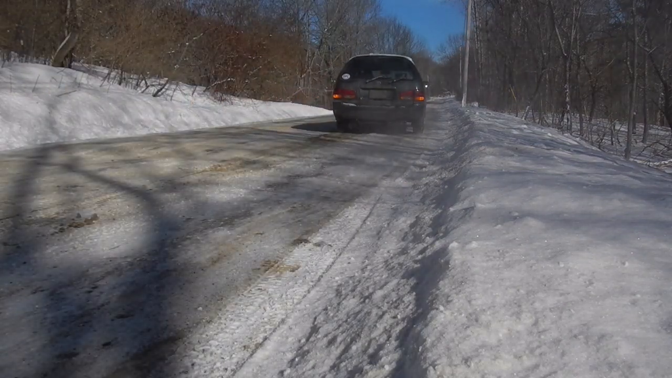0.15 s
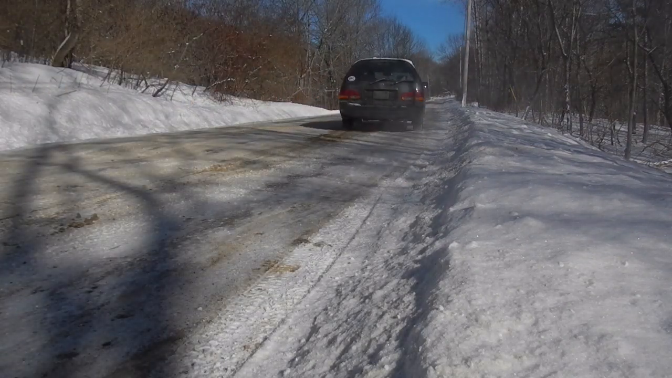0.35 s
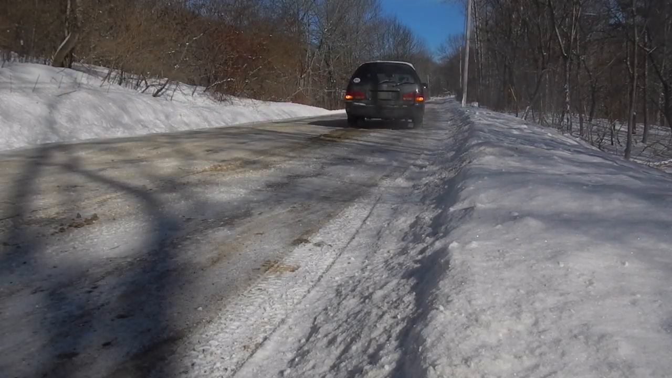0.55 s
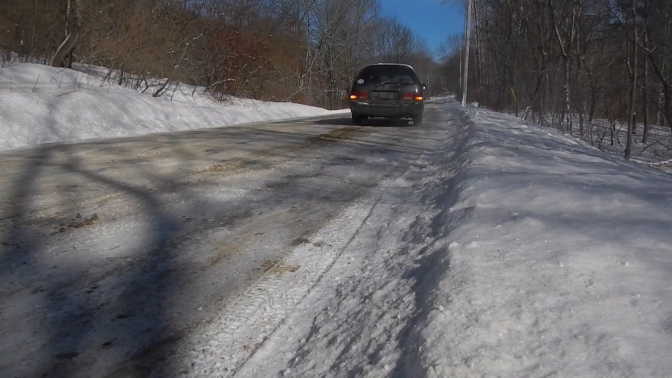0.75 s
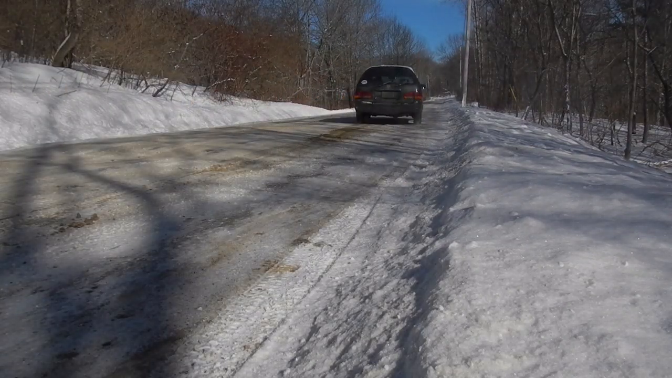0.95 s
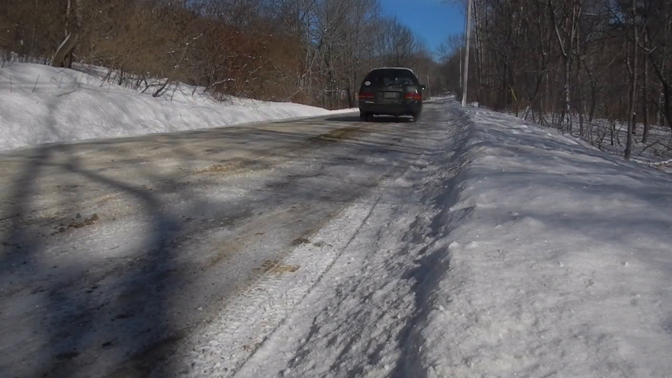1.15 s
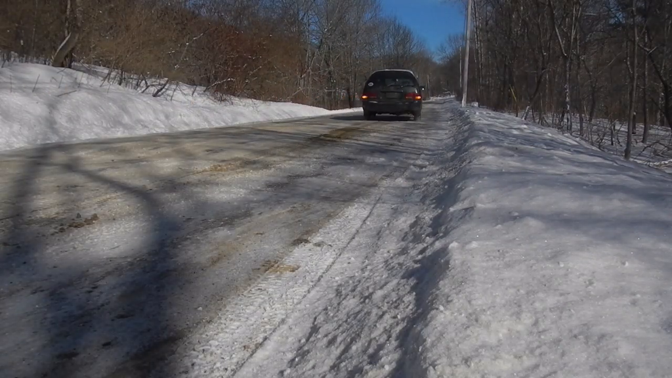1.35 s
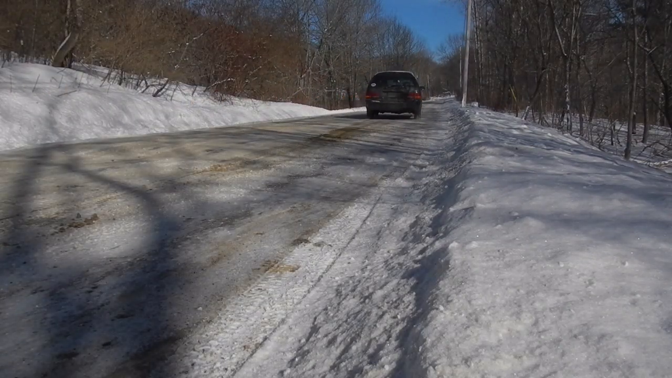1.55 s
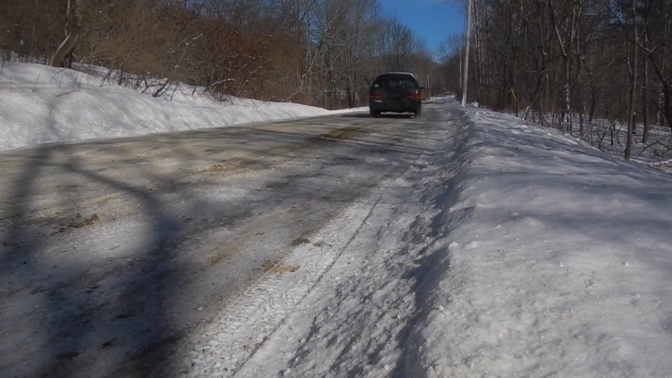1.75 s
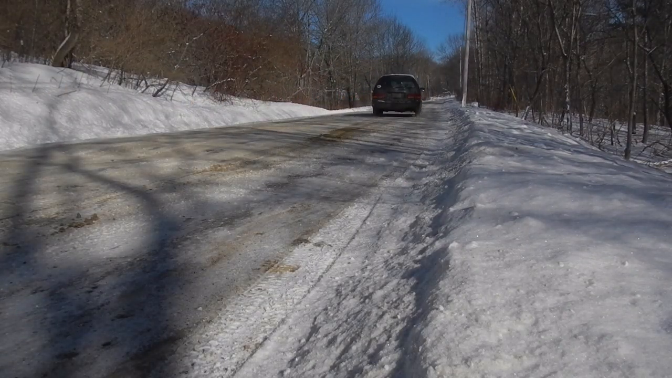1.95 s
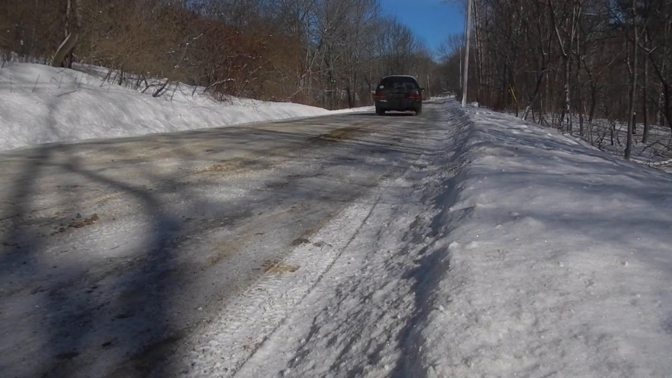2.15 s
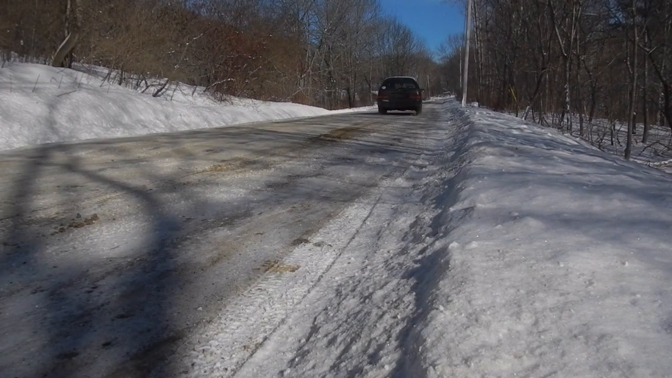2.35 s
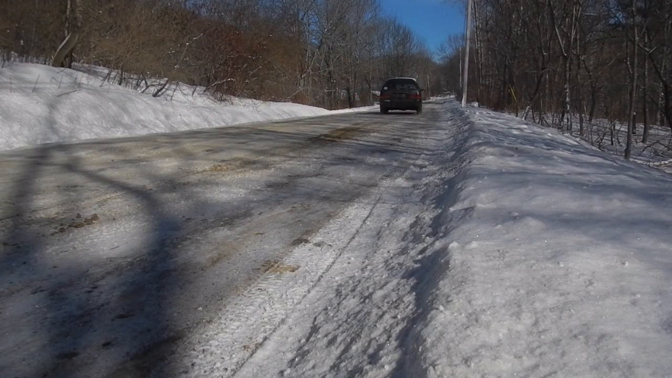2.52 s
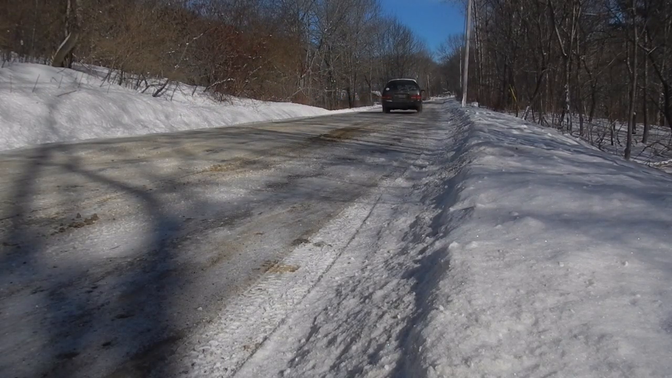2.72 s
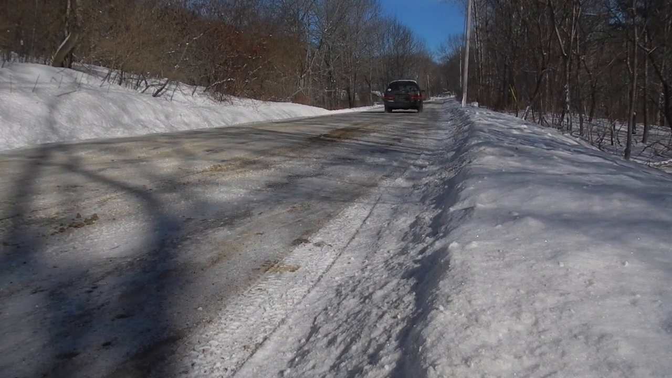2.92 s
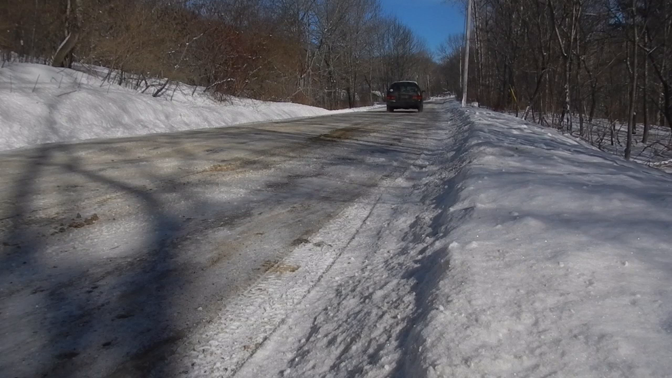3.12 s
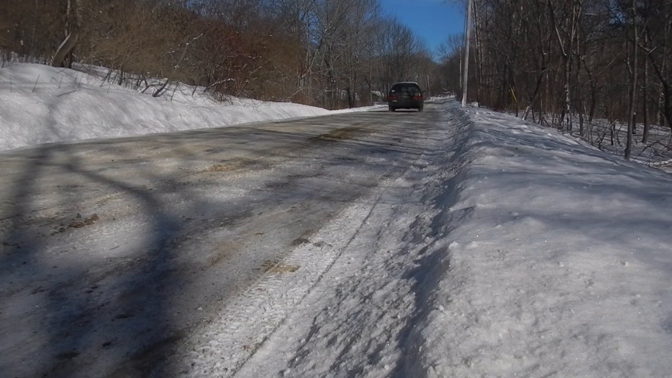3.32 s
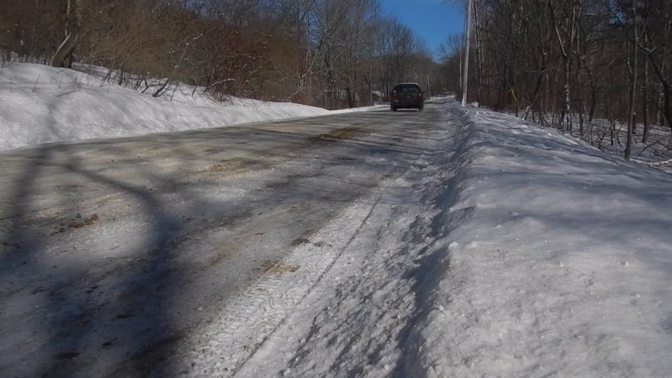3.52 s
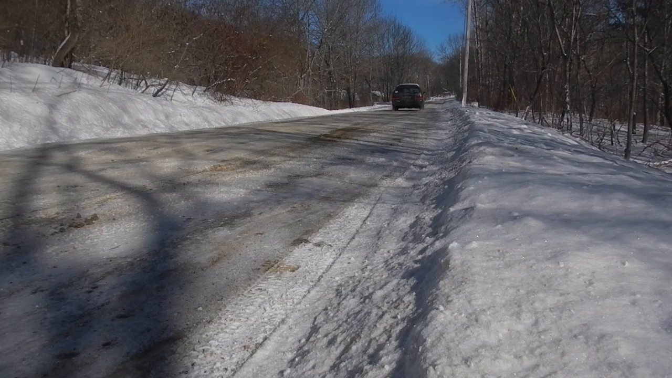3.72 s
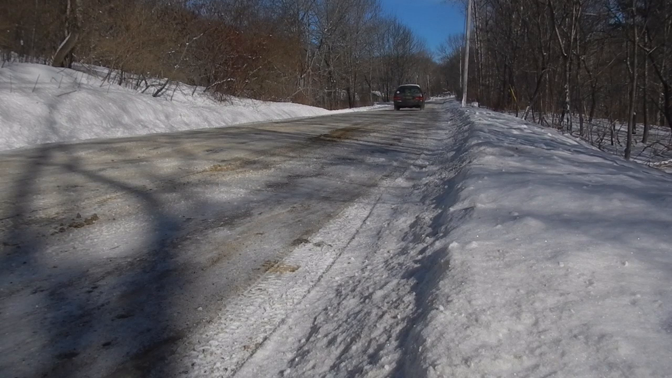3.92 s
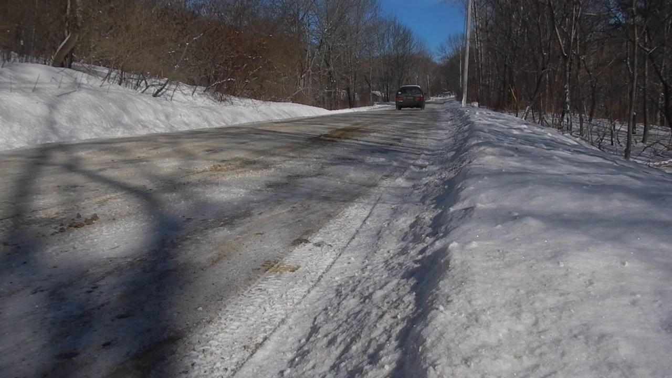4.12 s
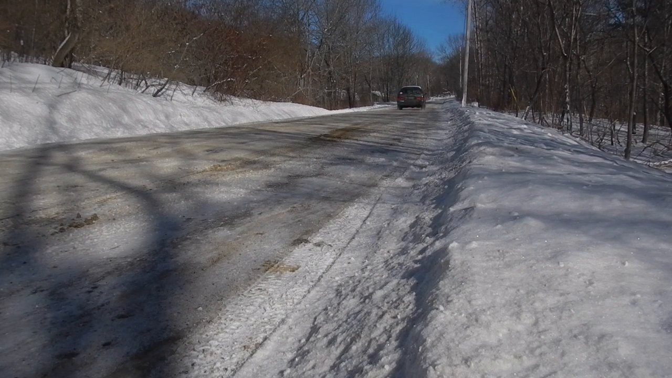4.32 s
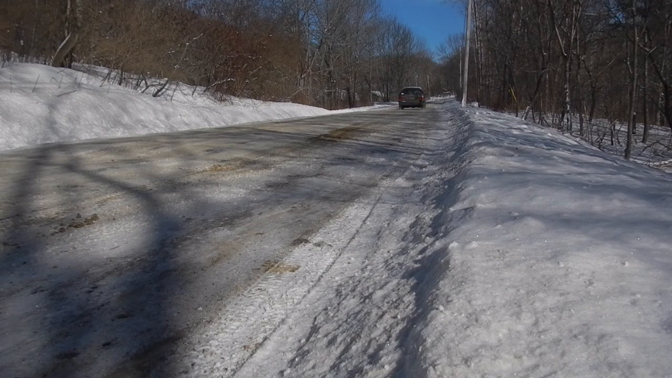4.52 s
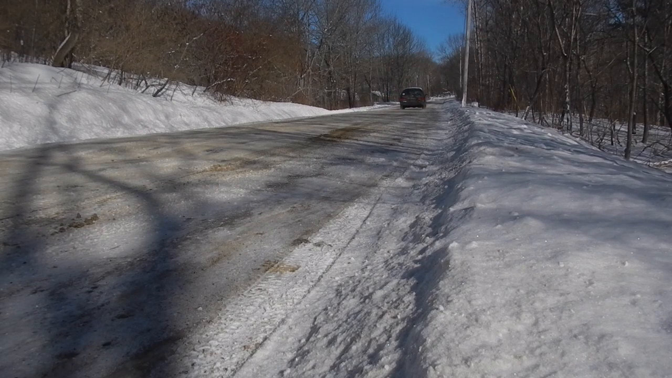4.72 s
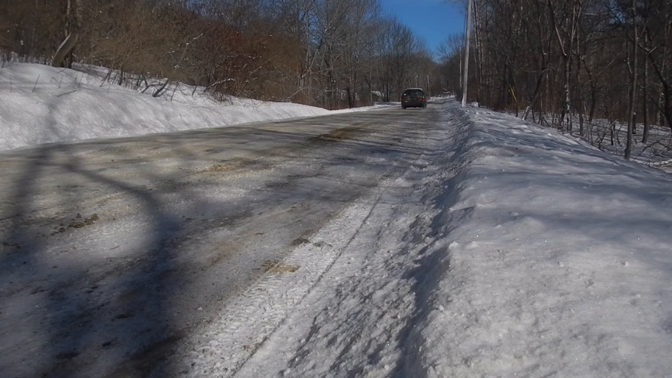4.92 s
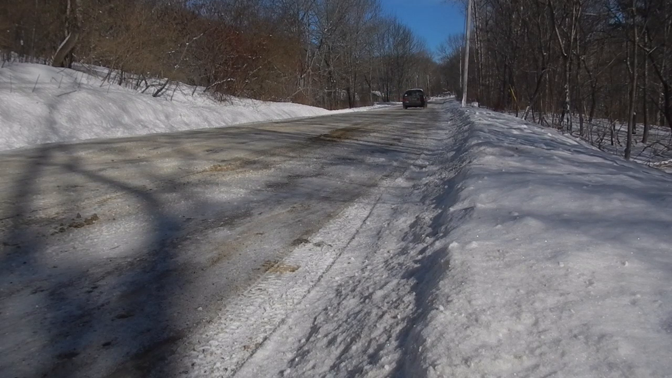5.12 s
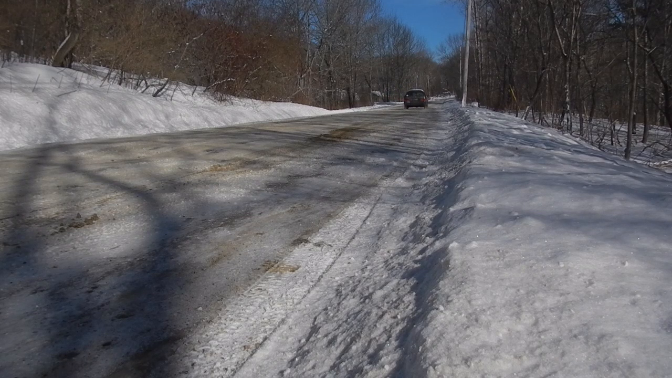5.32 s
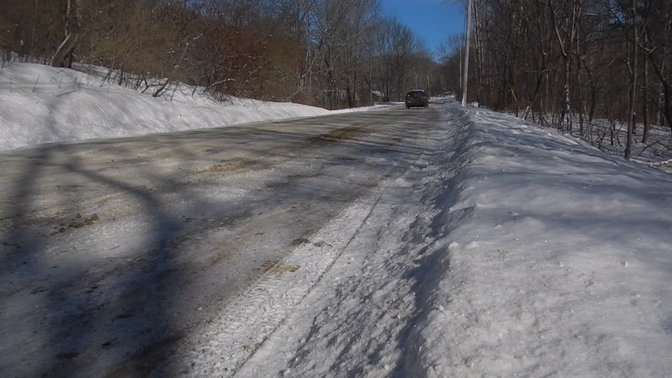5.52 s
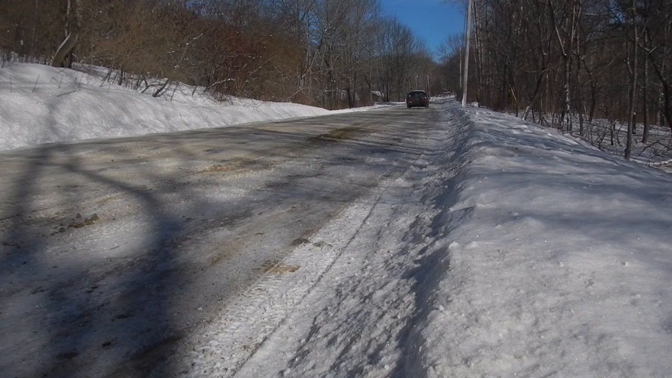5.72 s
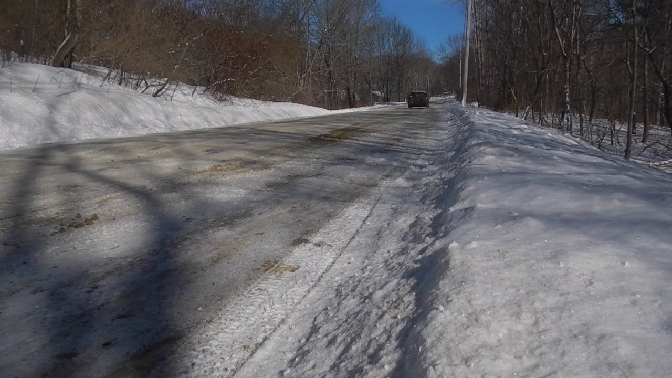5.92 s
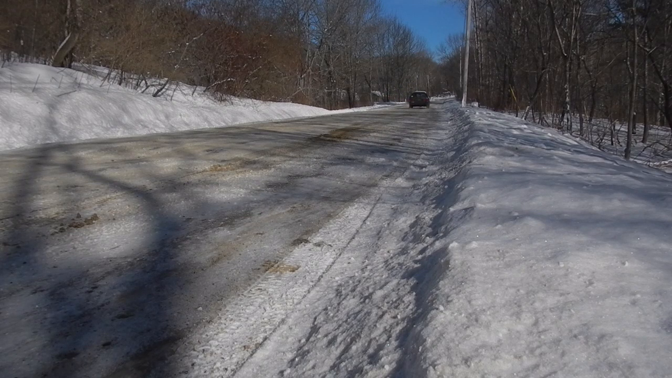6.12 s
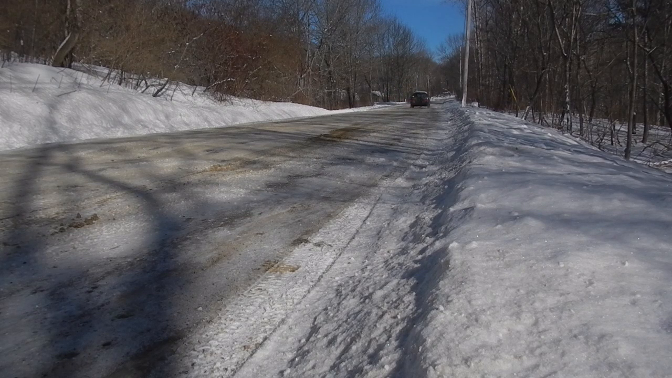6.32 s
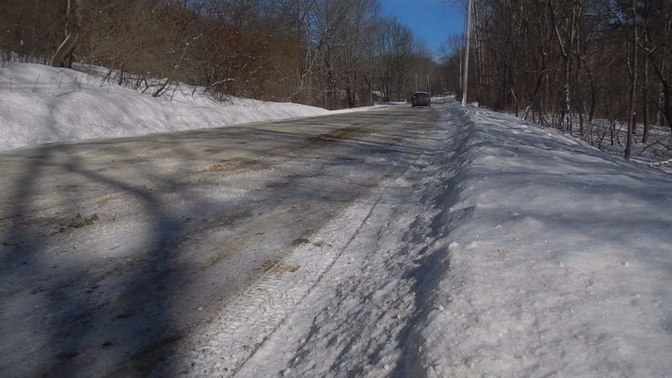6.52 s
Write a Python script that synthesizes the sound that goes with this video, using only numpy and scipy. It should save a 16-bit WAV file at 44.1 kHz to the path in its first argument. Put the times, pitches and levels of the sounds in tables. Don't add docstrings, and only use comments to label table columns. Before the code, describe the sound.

From 0 s a four-cylinder car, already about fifteen metres away, accelerates off along a snowy, tree-lined road. Its open exhaust makes a deep buzzing boom near 120 Hz with puffing rasp, rising slightly until 1.6 s. Broad tyre roar surrounds it, strongest at the start; gritty crunches cluster between 0.2 and 1.2 s, with dry stone ticks at 0.3 to 0.5 s, one at 1.2 s and a hard one at 2.1 s. Around 1.7 to 2.1 s it shifts up: the pitch sinks, the taller gear grips, and the note slowly climbs again to the end at 6.6 s, steadily quieter. Fine slush spray swells now and then, last near 5.9 s. Thin bird chips around 7.4 kHz dot the first 3.4 s. A far steady drone lies right; the stereo camera microphones add soft hiss, a faint high whine and tiny treble blips.

```python
import sys
import numpy as np
from scipy import signal
from scipy.fft import rfft, irfft, next_fast_len
from scipy.io import wavfile
from scipy.ndimage import map_coordinates

SR = 44100
rng = np.random.default_rng(int(sys.argv[2]) if len(sys.argv) > 2 else 0)


def dump(signal):
    limited = np.clip(np.atleast_2d(signal).T, -1, 1)
    pcm = np.round(limited * 32767).astype(np.int16)
    wavfile.write(sys.argv[1], SR, pcm)


def natural_amplitude(level_db):
    exponent = np.asarray(level_db, float) / 20
    return 10 ** exponent


N = 293706


def unit(x):
    return x / np.sqrt(np.mean(x ** 2) + 1e-20)


def along(points, hz):
    f, v = np.transpose(points)
    return np.interp(np.log(hz + 1), np.log(f + 1), v)


def curves(rows):
    s, *cols = np.transpose(rows)
    return [np.interp(np.arange(N) / SR, s, c) for c in cols]


def wobble(rate):
    at = np.arange(0, N + 16, 16)
    knots = rng.standard_normal(int(N * rate / SR) + 4)
    return np.interp(np.arange(N), at, map_coordinates(knots, [at * rate / SR]))


def filtered(x, response):
    m = next_fast_len(N + SR // 2)
    return irfft(rfft(x, m) * response(np.fft.rfftfreq(m, 1 / SR)), m)[..., :N]


def rush(spectrum, alike, source=None):
    pair = rng.standard_normal((2, N))
    if source is not None:
        pair = pair * source

    def mid_side(hz):
        turn = np.arccos(np.clip(along(alike, hz), -1, 1)) / 2
        return natural_amplitude(along(spectrum, hz)) * [np.cos(turn), np.sin(turn)]

    mid, side = filtered(pair, mid_side)
    return unit(np.array([mid + side, mid - side]))


# (frequency [Hz], left minus right [dB])
LEVEL_TILT = [(60, 0.5), (130, -0.6), (350, -1.8), (800, -2), (1400, -2.5), (2500, -0.5), (5000, -1.5)]
# (frequency [Hz], left leads by [rad])
PHASE_LEAD = [(35, 0), (60, -.45), (125, -.3), (190, -.22), (350, -.14), (800, -.07), (2400, 0),
              (3500, -.2)]


def ports(hz):
    half = natural_amplitude(along(LEVEL_TILT, hz) / 2) * np.exp(.5j * along(PHASE_LEAD, hz))
    return np.array([half, 1 / half])


START_M, SPEED_M_S, GAIN_M_S2 = 14.9, 6.1, 1


def spreading_db():
    t = np.arange(N) / SR
    return -20 * np.log10(1 + (SPEED_M_S * t + GAIN_M_S2 * t ** 2 / 2) / START_M)


# (time [s], shaft rate [Hz], throttle [dB])
ENGINE = [(0, 60.18, 2), (.35, 62.72, .5), (.75, 64.35, -0.5), (1.1, 66.3, .5), (1.4, 67.55, 1),
          (1.6, 67.74, .5), (1.7, 65.42, 0), (1.9, 60.47, 0), (2.02, 59.63, -2), (2.3, 59.17, 0),
          (2.7, 60.05, 0), (3.1, 61.63, 0), (3.45, 62.22, .5), (3.75, 63.6, -.5), (4.08, 63.8, 0),
          (4.35, 64.85, -1), (5.3, 66.34, -1), (6.66, 69.3, -0.5)]
PIPE_TUNING = {1: [(59, 1), (64, 2.5), (69, 0)], 2: [(118, 17.5), (122, 16), (127, 13.5), (131, 10.5),
               (138, 7.5)], 3: [(177, 3.5), (180, 1), (183, -4), (186.5, -1), (189.5, 4), (195, 6),
               (200, 2.5), (206, -3.5)], 6: [(356, -8), (365, -7.5), (372, -3.5), (379, 1), (388, -1),
               (396, -4.5), (402, -12.5), (415, -15)], 9: [(535, -18.5), (545, -12), (558, -20.5),
               (572, -9.5), (590, -18), (620, -19)]}
# (roughness [dB], share of the load [1], level while the clutch grips [dB])
TUNED_ORDERS = [
    (0.84, 0.63, 0.5),
    (0.1, 0.01, 0.5),
    (0.54, -0.36, -10),
    (0.5, 0.01, 1),
    (1.2, 2.1, -4),
]
# (shaft order [1], level against order 1 [dB], slope [dB per Hz of shaft], load share [1])
WEAK_ORDERS = [(.5, -15, -1.5, 1), (1.25, -19, -2, -0.43), (1.5, -18, 0.45, -1), (1.75, -15.5, 0.02, -0.73),
               (2.25, -37, -7, 0), (2.5, -23, 0, -0.6), (2.75, -17.5, -1.7, 0.16),
               (3.25, -12.5, -1.36, -0.12), (3.75, -22.5, 0.2, -0.98), (4, -6.5, -0.23, 0.23),
               (4.5, -25, 0.5, -0.48), (4.75, -10.5, -1.5, 1), (5, -9, -1.8, -0.19), (6.75, -13, -1, 0.85),
               (7, -8, -1.65, 0.85), (8, -11, -1, 1.64)]
# (frequency [Hz], lead [rad])
PIPE_PHASE = [(60, .8), (125, 0), (180, .5), (188, 2.2), (205, 1.8), (240, 3), (275, 4.2), (360, 8),
              (375, 9), (410, 8), (600, 14)]
# (frequency [Hz], density [dB per Hz])
RASP = [(15, -45), (30, -31), (75, -13), (100, -8.5), (130, -8), (226, -15.5), (320, -21), (385, -13.5),
        (467, -24.5), (700, -31.5), (1000, -62), (1500, -120)]
FIRST_ORDER_DB = -35.5
RASP_DB, RASP_THINS = -39, 0.83
LOADED_S, LOADING_S, LIGHT_DB, GRIP_S = 2.07, 0.31, -4.5, 0.1
STEP = 8


def exhaust():
    shaft_hz, throttle_db = curves(ENGINE)
    t = np.arange(N) / SR
    turn = 2 * np.pi * (np.cumsum(shaft_hz) / SR + .768)
    first_db = FIRST_ORDER_DB + throttle_db + spreading_db()
    load_db = LIGHT_DB * np.clip((LOADED_S - t) / LOADING_S, 0, 1)
    grip = np.exp(-((t - LOADED_S) / GRIP_S) ** 2)

    def order(k, db, rough):
        hz = k * shaft_hz[::STEP]
        phase = k * turn[::STEP] + along(PIPE_PHASE, hz) + 0.031 * rough * wobble(25)[::STEP]
        level_db = (first_db + db + rough * wobble(25))[::STEP]
        return np.sqrt(2) * natural_amplitude(level_db) * np.real(ports(hz) * np.exp(1j * phase))

    boom = 0
    for k, (rough, share, grip_db) in zip(PIPE_TUNING, TUNED_ORDERS):
        tuned_db = along(PIPE_TUNING[k], k * shaft_hz)
        boom = boom + order(k, tuned_db + share * load_db + grip_db * grip, rough)
    for k, db, slope, share in WEAK_ORDERS:
        weak_db = db + slope * (shaft_hz - 60) + share * load_db + 0.64 * wobble(3.2)
        boom = boom + order(k, weak_db, rough=.9)
    boom = signal.resample_poly(boom, STEP, 1, axis=1, padtype="line")[:, :N]

    puffs = 1 + 0.19 * np.cos(turn) + 0.15 * np.cos(2 * turn)
    gusts_db = .5 * wobble(7.6)
    rasp_db = RASP_DB + RASP_THINS * spreading_db() + 0.083 * load_db + gusts_db
    rasp = natural_amplitude(rasp_db) * rush(RASP, [(100, 0.85), (600, 0.82)], puffs)
    return boom + filtered(rasp, ports)


# (frequency [Hz], density [dB per Hz])
ROAR = [(260, -38), (340, -17), (400, 0), (470, -3), (570, -4.5), (650, -6), (990, -7), (1400, -16),
        (1930, -16), (2500, -19.5), (3300, -22), (3700, -19.5), (4300, -26.5), (5500, -35), (7150, -61),
        (12000, -120)]
# (frequency [Hz], likeness [1])
ROAR_ALIKE = [(60, 0.88), (150, 0.73), (380, 0.81), (950, 0.9), (2380, 0.44), (5980, 0.16), (15000, 0.45)]
# (middle [s], half length [s], lift [dB])
COARSE_ROAD = [
    (.22, 0.32, 2.5),
    (3.74, 1.1, 0.9),
]
# (frequency [Hz], density [dB per Hz])
GRIT = [(1200, -11), (2000, 2), (2600, 3), (3600, 1.5), (4500, -4.5), (5300, -19), (9000, -29)]
# (middle [s], length [s], level [dB])
GRIT_PATCHES = [
    (0.31, 0.47, -52.5),
    (0.352, 0.089, -54),
    (0.466, 0.13, -59.5),
    (0.72, .06, -54),
    (0.873, 0.18, -53),
    (1.1, 0.32, -58.5),
]
# (frequency [Hz], density [dB per Hz])
SPRAY = [(4000, -32), (5500, -5), (6800, 3.5), (9000, -2.5), (12500, -0.5), (14000, -9), (14150, -120)]
# (time [s], more spray [dB])
SLUSH = [
    (.35, 2),
    (.8, 3.5),
    (1.8, 2),
    (2.85, 3),
    (3.9, 2.5),
    (4.85, 1.5),
    (5.9, 5),
]
ROAR_DB, ROAR_THINS = -44.5, 0.42
BARE_DB = -58.5
SLUSH_S = 0.15


def tyres():
    t = np.arange(N) / SR
    coarse_db = sum(db * np.exp(-((t - s) / half) ** 2) for s, half, db in COARSE_ROAD)
    unsteady_db = .35 * wobble(5) + 0.91 * wobble(30)
    roar_db = ROAR_DB + ROAR_THINS * spreading_db() + coarse_db + unsteady_db
    roar = natural_amplitude(roar_db) * rush(ROAR, ROAR_ALIKE)

    grains_db = np.minimum(3.2 * rng.exponential(size=N // 40 + 1), 13)
    grains = natural_amplitude(grains_db).repeat(40)[:N]
    clumps_db = 1.0 * wobble(40)
    gritty = natural_amplitude(BARE_DB)
    for s, length, db in GRIT_PATCHES:
        gritty = gritty + natural_amplitude(db) * np.exp(-(2 * (t - s) / length) ** 4)
    crunch = gritty * natural_amplitude(-2.5 * t + clumps_db) * rush(GRIT, [(3000, 0.96)], grains)

    wet_db = sum(db * np.exp(-((t - s) / SLUSH_S) ** 2) for s, db in SLUSH)
    flutter_db = .6 * wobble(9)
    spray = natural_amplitude(-62 - 1.87 * t + wet_db + flutter_db) * rush(SPRAY, [(6000, 0.15), (12000, .1)])
    return filtered(roar + crunch, ports) + spray


# (time [s], peak level [dB], ring [Hz], left minus right [dB])
STONES = [
    (.2885, -43, 2900, -.5),
    (0.3266, -37, 3100, -.5),
    (0.3567, -41, 2800, -.5),
    (.3652, -42, 2300, -.5),
    (.4562, -45, 3000, -.5),
    (.5012, -43, 3000, -.5),
    (1.1723, -44, 3700, -6),
    (2.085, -40.5, 3370, -5),
    (2.0859, -51, 6590, -8),
]


def stones():
    out = np.zeros((2, N))
    t = np.arange(SR // 50) / SR
    for s, db, hz, pan_db in STONES:
        burst = natural_amplitude(db - 60 * t / 0.01) * rng.standard_normal(len(t))
        tone = unit(natural_amplitude(-60 * t / 0.0028) * np.sin(2 * np.pi * hz * t)) / 20
        ring = np.convolve(burst, tone)[:len(t)]
        out[:, round(s * SR):][:, :len(t)] += ring * natural_amplitude([[pan_db / 2], [-pan_db / 2]])
    return out


# (start [s], peak level [dB], pitch [Hz], length [s])
CHIPS = [
    (0.148, -65, 7220, 0.055),
    (0.196, -61, 7450, 0.078),
    (0.605, -65, 7410, 0.076),
    (.92, -71, 7450, 0.046),
    (1.725, -65, 7330, 0.093),
    (2.08, -65, 7480, .04),
    (2.372, -67, 7360, 0.066),
    (2.715, -63, 7450, .06),
    (3.332, -67, 7290, 0.038),
]


def bird():
    out = np.zeros(N)
    for s, db, hz, length in CHIPS:
        u = np.linspace(0, 1, round(max(length, .01) * SR))
        blur = 1 + .6 * wobble(180)[:len(u)]
        pitch_hz = hz * (1 + .03 * (u - .5) + .012 * wobble(250)[:len(u)])
        note = np.sin(2 * np.pi * np.cumsum(pitch_hz) / SR)
        swell = np.sin(np.pi * u) ** .8
        out[round(s * SR):][:len(u)] += natural_amplitude(db - 1) * swell * blur * note
    return out * natural_amplitude([[1.5], [-1.5]])


# (frequency [Hz], density [dB per Hz])
DRONE = [(600, -26), (1000, -8.5), (1350, -10.5), (1580, -6), (1695, -1.5), (1800, -8.5), (2100, -15.5),
         (2600, -47), (4000, -120)]


def drone():
    noise = natural_amplitude(-54.5 + 0.69 * wobble(2.9)) * rush(DRONE, [(1000, 0.38), (1700, 0.88)])

    def from_right(hz):
        lag = np.array([[.5j], [-.5j]]) * np.clip(hz / 700 - 1.4, 0, 1)
        return natural_amplitude([[-4.5], [4.5]]) * np.exp(lag)

    return filtered(noise, from_right)


def scene():
    return exhaust() + tyres() + stones() + bird() + drone()


def roll_off(x):
    return signal.sosfilt(signal.butter(12, 15710, fs=SR, output="sos"), x)


# (frequency [Hz], level [dB], left minus right [dB])
WHINE = (14835.5, -62, 5.5)
# (frequency [Hz], density [dB per Hz])
HISS = [(2350, -4), (4000, -8.5), (4800, -0.5), (5900, -6), (9000, -6.5), (13100, -8.5), (13600, -3),
        (14300, -13)]
# (frequency [Hz], density [dB per Hz])
TOP_HISS = [(14950, -120), (15000, 0), (15700, -5)]
TOP_HZ = 14300


def record(dry):
    hz, db, pan_db = WHINE
    flicker_db = 1.3 * wobble(45)
    tone = np.sin(2 * np.pi * hz * np.arange(N) / SR)
    whine = natural_amplitude(db + flicker_db) * tone * natural_amplitude([[pan_db / 2], [-pan_db / 2]])
    hiss = natural_amplitude(-61.5 + 1.0 * wobble(5.3)) * rush(HISS, [(4000, 0.12), (12000, 0.041)])
    gate = np.clip(4 * (wobble(22) - np.linspace(1.1, .2, N)), 0, 1)
    blips = natural_amplitude(-78) * gate * rush(TOP_HISS, [(100, .9)])
    mix = filtered(dry + hiss, lambda f: f < TOP_HZ) + blips + whine
    return roll_off(mix)


dry = scene()
out = record(dry)
dump(out)
```